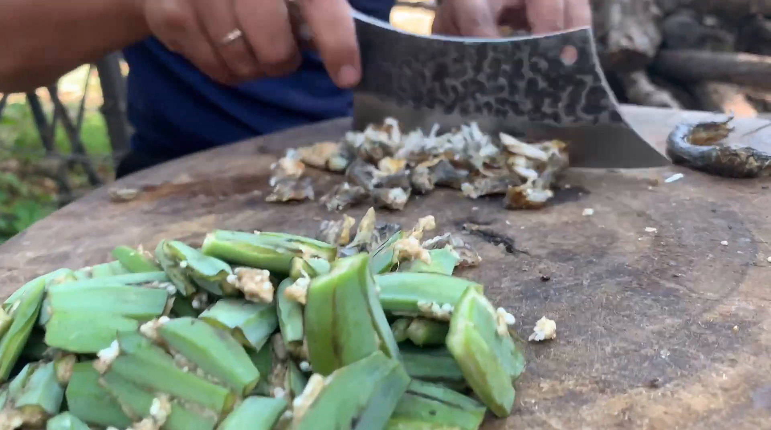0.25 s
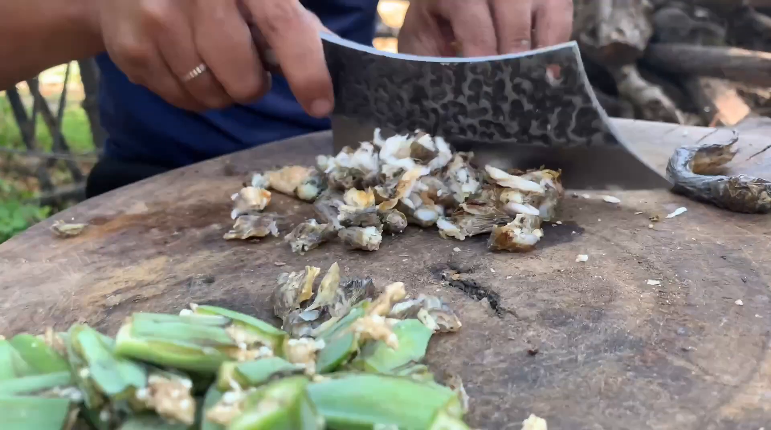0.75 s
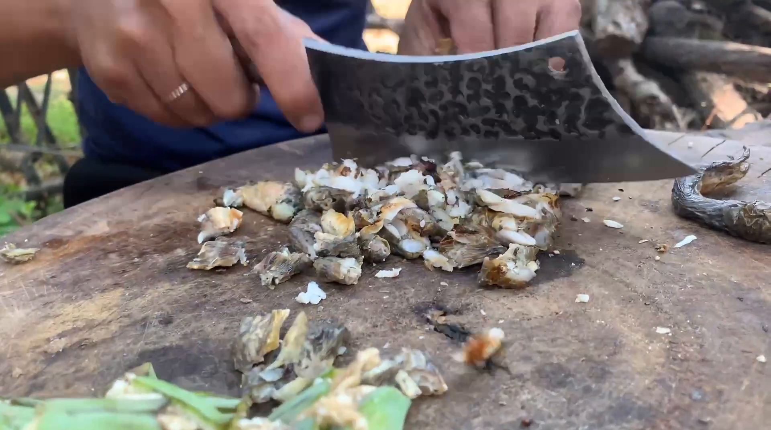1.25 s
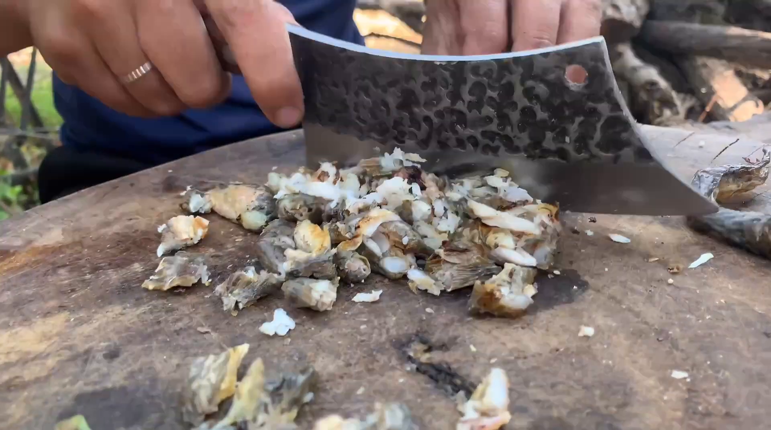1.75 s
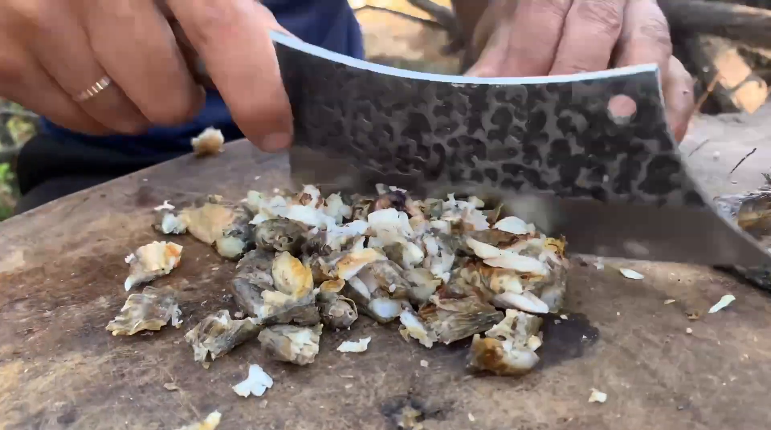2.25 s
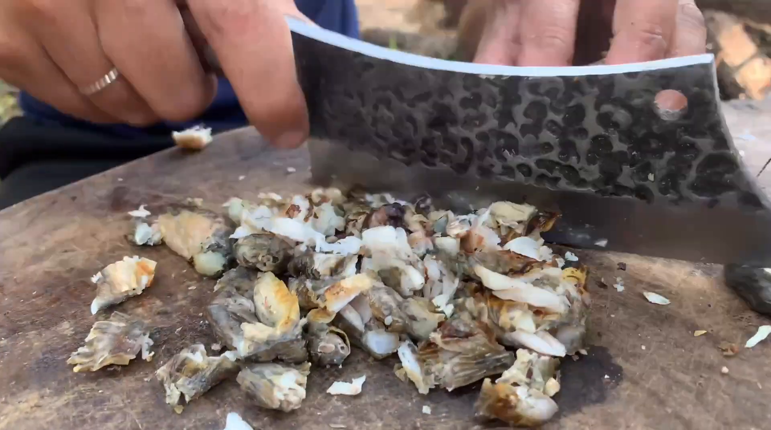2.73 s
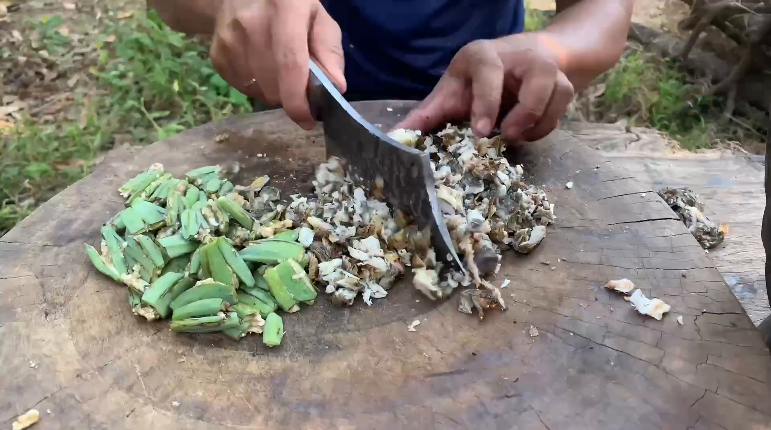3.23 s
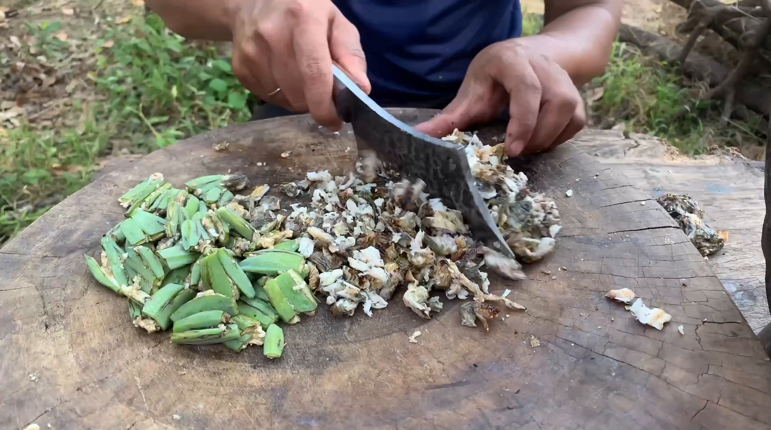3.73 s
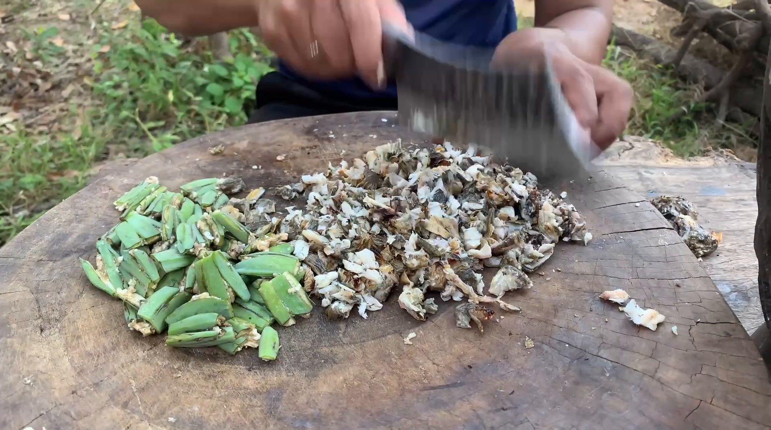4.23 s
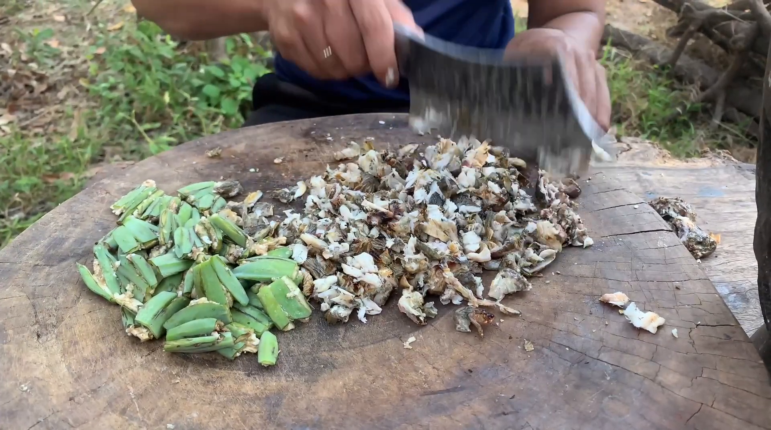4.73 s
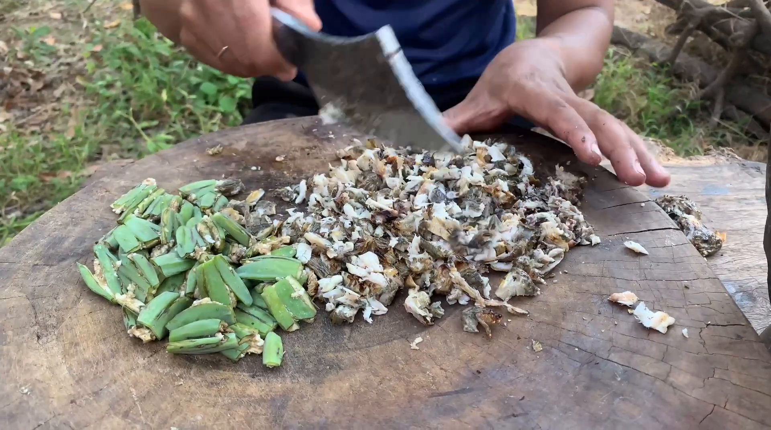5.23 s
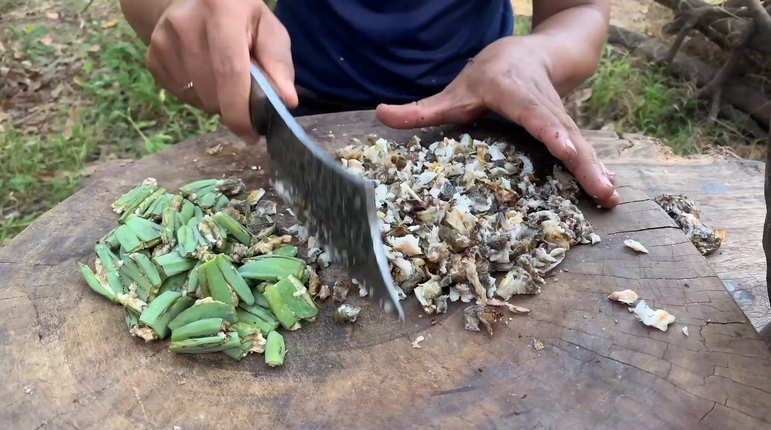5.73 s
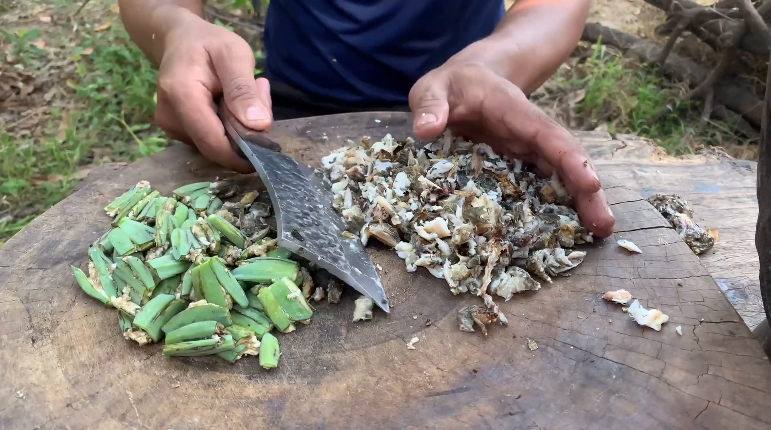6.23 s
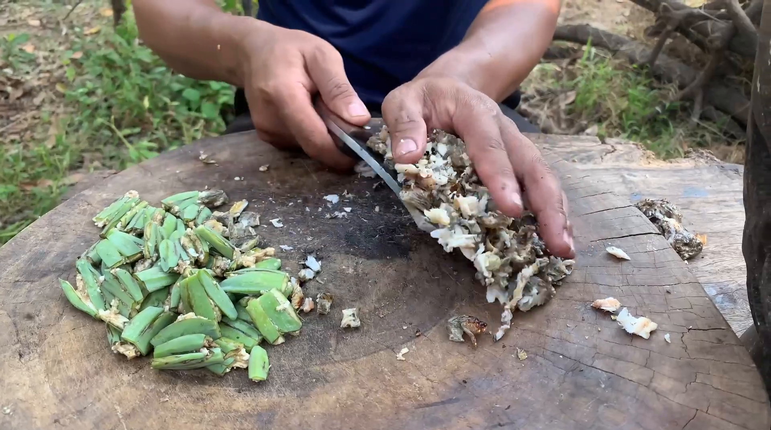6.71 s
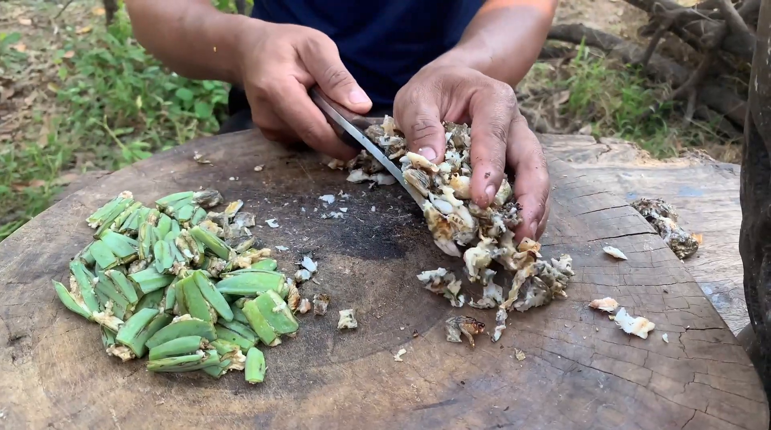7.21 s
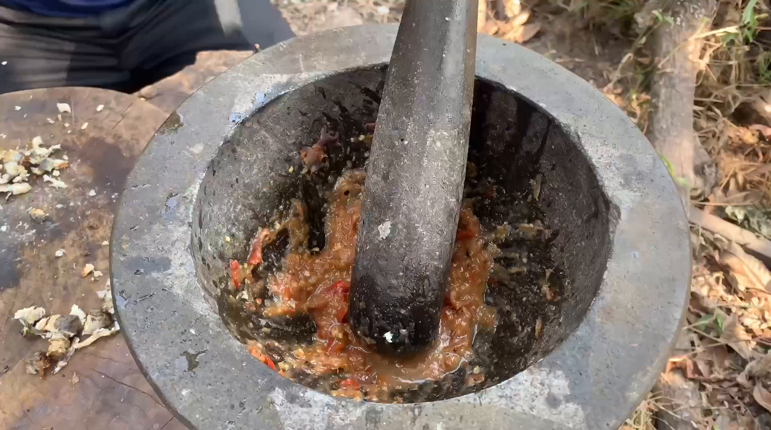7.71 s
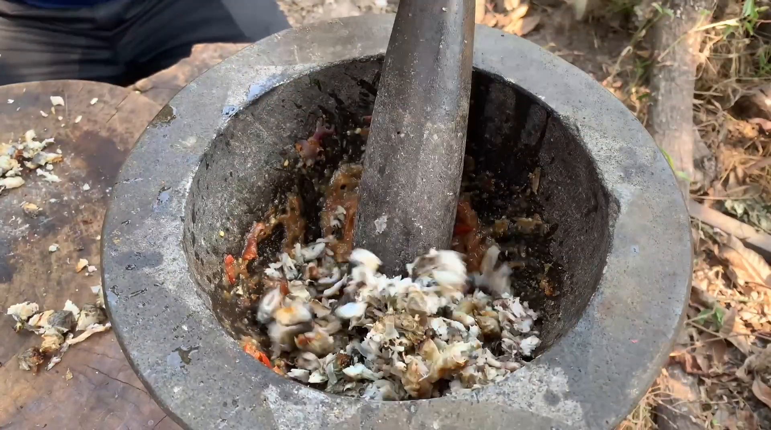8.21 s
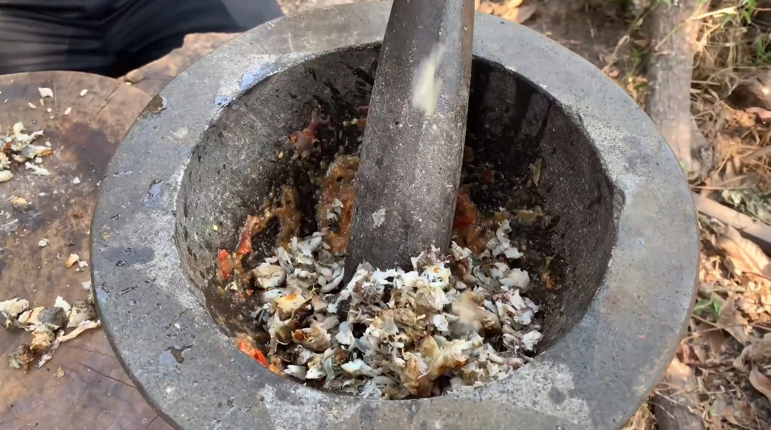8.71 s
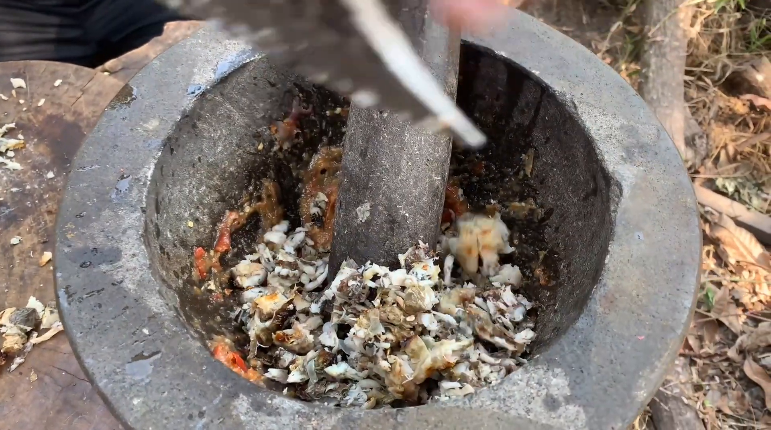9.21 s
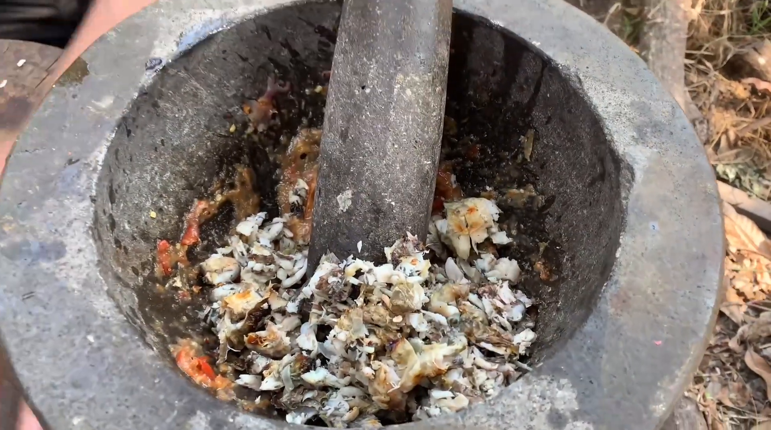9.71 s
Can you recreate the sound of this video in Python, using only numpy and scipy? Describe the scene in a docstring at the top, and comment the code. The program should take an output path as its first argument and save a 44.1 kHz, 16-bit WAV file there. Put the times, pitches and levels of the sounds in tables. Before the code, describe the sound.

Quick, even cleaver chops thud into wood and scatter crumbs, then the food is quietly scraped up and a pestle knocks on stone.

```python
"""Outdoors, at a thick tree-trunk block, a heavy steel cleaver chops brittle cooked food four times a second.
Each stroke cracks onto the wood and scatters crackling debris; the impact excites the damped
normal modes of blade and block, and the trunk thumps and rumbles. Then the heap is scraped together and
tipped into a stone mortar, both heard as friction noise, and the pestle knocks the bowl into vibration.
Far rumble and air hiss lie below."""
import sys
import numpy as np
from scipy import signal
from scipy.fft import rfft, irfft
from scipy.io import wavfile

SR = 44100
rng = np.random.default_rng(int(sys.argv[2]) if len(sys.argv) > 2 else 0)


def transcribe(signal):
    """Save signal, clipped to [-1, 1], as a 16-bit WAV file at the path in sys.argv[1]."""
    frames = np.atleast_2d(signal).T
    limited = np.clip(frames, -1, 1)
    pcm = np.round(limited * 32767).astype(np.int16)
    wavfile.write(sys.argv[1], SR, pcm)


N = 439233


def amp(db):
    """Amplitude ratio of a level: a factor of ten per 20 dB."""
    return 10 ** (np.asarray(db) / 20)


def in_time(rows):
    """Linear interpolation of each level column at every sample."""
    times_s, *columns = np.transpose(rows)
    return [np.interp(np.arange(N) / SR, times_s, column) for column in columns]


def drift(rate_hz):
    """Slow random modulation: interpolated Gaussian values with a spread near 1."""
    knots = rng.standard_normal(int(N / SR * 60) + 2)
    return np.interp(np.arange(N) * rate_hz / SR, np.arange(len(knots)), knots) * 1.2


def coloured(source, spectrum):
    """Spectral shaping by a curve of level against log frequency; rms 1."""
    hz = np.arange(1, N // 2 + 2) * SR / N
    knots_hz, density_db = np.transpose(spectrum)
    gain = amp(np.interp(np.log(hz), np.log(knots_hz), density_db, -90, -90))
    out = irfft(rfft(source) * gain, N)
    return out / np.sqrt(np.mean(out ** 2))


def noise(coherence):
    """Partially coherent white noise in two channels."""
    mid, side = rng.standard_normal((2, N))
    return np.sqrt(1 + coherence) * mid + np.sqrt(1 - coherence) * side * [[1], [-1]]


def grains(per_s, spread_db, coherence):
    """Shot noise: random snaps of uneven size over a floor of white noise."""
    sizes = amp(spread_db * np.minimum(rng.exponential(1, N), 4))
    occurs = rng.random(N) < per_s / SR
    return (sizes * occurs + 0.37) * noise(coherence)


def add(track, sound, start_s):
    """Superposition of a short stereo sound on a track."""
    at = int(start_s * SR)
    track[:, at:at + sound.shape[1]] += sound[:, :N - at]


def swell(peak_s, level_db, rise_s, fall_s):
    """Exponential growth up to a moment and exponential decay after it."""
    t = np.arange(N) / SR - peak_s
    return amp(level_db) * np.exp(np.where(t < 0, t / rise_s, -t / fall_s).clip(-40))


def held(rows, attack_s=0.014, release_s=0.023):
    """Linear attack, hold and exponential release: one envelope per level column."""
    t, out = np.arange(N) / SR, 0
    for start_s, held_s, *levels_db in rows:
        attack = np.clip((t - start_s) / attack_s, 0, 1)
        release = np.exp(-np.clip(t - start_s - held_s, 0, 1) / release_s)
        out = out + np.outer(amp(levels_db), attack * release)
    return out


def struck(modes, contact_s, rattle, rattle_s, t60_scale=1.0, detune=0.033, size=int(0.4 * SR)):
    """Modal response to a blow and its dying rattle, low-passed by the contact time; mono peak 1."""
    t = np.arange(size) / SR
    rattle_shape = t / rattle_s * np.exp(1 - t / rattle_s)
    jolts = (t == 0) + rattle / np.sqrt(rattle_s * SR) * rng.standard_normal(size) * rattle_shape
    force = signal.lfilter(np.hanning(int(contact_s * SR) + 3), [1], jolts)
    out = np.zeros((2, size))
    for hz, level_db, t60_s, pan_db, lead_rad in modes:
        pitch_luck, level_luck, phase_luck = rng.standard_normal(3)   # no two blows are alike
        decay = amp(-60 / (t60_s * t60_scale * SR))
        pole = decay * np.exp(2j * np.pi * hz * (1 + detune * pitch_luck) / SR)
        ring = signal.lfilter([1, -1], [1, -pole], force) / abs(1 - pole)   # a steady push is silent
        phase_rad = lead_rad + phase_luck * (hz / 1400) ** 2   # higher modes differ more between sides
        left = amp(pan_db / 2) * np.exp(0.5j * phase_rad)
        out += np.imag(amp(level_db + 2 * level_luck) * ring * [[left], [1 / left]])
    return out / np.max(np.abs(out.mean(0)))


def favour(modes, favoured_hz, db_per_octave):
    """The point of impact weights the modes: levels fall away on both sides of one pitch."""
    return [(hz, level_db - db_per_octave * abs(np.log2(hz / favoured_hz)), *rest)
            for hz, level_db, *rest in modes]


def band_filtered(peaks, source, wander_db=4):
    """Parallel two-pole band-pass filters whose levels wander independently; rms 1."""
    out = 0
    for hz, width_hz, level_db in peaks:
        radius = np.exp(-np.pi * width_hz / SR)
        poles = [1, -2 * radius * np.cos(2 * np.pi * hz / SR), radius ** 2]
        response = (1 - radius ** 2) * signal.lfilter([1, 0, -1], poles, source)
        out = out + amp(level_db + wander_db * drift(35)) * response
    return out / np.sqrt(np.mean(out ** 2))


# Background level curves: time_s, rumble_db, murmur_db, hiss_db
AIR_LEVELS = [(0.0, -48.5, -53.5, -69), (0.64, -59.5, -62.5, -75.5), (3.15, -55.5, -67, -72.5),
              (3.35, -49, -60.5, -63.5), (5.0, -56, -63, -65), (5.3, -54, -60, -65),
              (6.7, -52.5, -60.5, -60.5), (7.65, -54.5, -61.5, -63.5), (7.75, -49, -66, -64),
              (9.96, -53.5, -63, -65)]
# Spectra of the three background noises: frequency_hz, density_db
RUMBLE_SPECTRUM = [(12, -44.5), (20, -15), (41, -10), (65, -4), (124, -13.5), (178, -27), (200, -26),
                   (260, -64.5), (440, -120)]
MURMUR_SPECTRUM = [(88, -48.5), (150, -3.5), (539, -7), (634, -9), (814, -11), (1090, -13), (1350, -14.5),
                   (2000, -20), (2600, -40.5), (4400, -120)]
HISS_SPECTRUM = [(880, -37), (1500, -3), (1910, 6), (2820, 5), (4310, 4), (6600, -3), (7150, -9),
                 (8390, -2), (11000, -15.5), (12500, -52), (16200, -90), (22000, -120)]
def air():
    """Amplitude-modulated ambient noise: lumpy far rumble, a soft murmur of air and hiss."""
    rumble_db, murmur_db, hiss_db = in_time(AIR_LEVELS)
    rumble = amp(rumble_db + 2.0 * drift(2.3)) * coloured(noise(0.98), RUMBLE_SPECTRUM)
    murmur = amp(murmur_db + 0.94 * drift(37)) * coloured(noise(0.056), MURMUR_SPECTRUM)
    hiss = amp(hiss_db - 3.5 + 0.84 * drift(8.6)) * coloured(noise(0.0083), HISS_SPECTRUM)
    return rumble + murmur + hiss


# Brief spells of a faint band of noise: start_s, held_s, level_db
BAND_SPELLS = [(4.845, 0.093, -60), (9.54, 0.096, -63), (9.65, 0.32, -58)]
# Its spectral peaks: centre_hz, width_hz, level_db
BAND_PEAKS = [(1700, 200, 0), (2020, 110, 6), (2600, 250, -6), (3880, 200, -3)]
def faint_band():
    """Band-pass filtering: a brief faint band of noise near 2 kHz."""
    envelope, = held(BAND_SPELLS)
    return envelope * band_filtered(BAND_PEAKS, noise(0.18))


def rustle(patch_db=3.5):
    """Shot noise of moist food shifting under hand and blade, in patches, following the hiss level."""
    hiss_db = in_time(AIR_LEVELS)[2]
    shifting = coloured(grains(500, 4.0, 0.3), HISS_SPECTRUM)
    shared_drift, out = drift(7), 0
    for band_hz in [(1200, 2600), (2600, 5000), (5000, 8000), (8000, 12000)]:
        band = signal.sosfilt(signal.butter(2, band_hz, "band", fs=SR, output="sos"), shifting)
        out = out + amp(patch_db * (shared_drift + 0.8 * drift(26))) * band
    return amp(hiss_db - 1 - patch_db) * out


# Crumbs that snap or land: time_s, peak_db, pitch_hz, pan_db
CRUMB_SNAPS = [(0.43, -43, 2600, -2), (0.681, -39.5, 2400, 6), (0.68, -67, 6940, -6),
               (0.8775, -57, 4820, -0.5), (1.3053, -48, 4500, -5), (1.672, -59, 4840, 3),
               (2.124, -64, 4000, 1.5), (2.146, -50, 5800, 0.5), (2.196, -56.5, 4200, 0),
               (2.537, -51, 7000, 0), (2.557, -57, 9200, -2), (2.629, -52, 5940, 3), (2.68, -55, 7470, -3),
               (4.007, -37, 4960, 2), (4.799, -42, 3500, 4), (3.186, -51.5, 2580, -0.5),
               (3.473, -33, 3980, -1.5), (3.774, -46, 6550, 0), (3.814, -47.5, 3980, -2.5),
               (6.7864, -48.5, 4280, -2), (6.9502, -50, 3080, -1), (7.6945, -46, 1800, -7.5),
               (7.899, -46, 4240, 0), (7.926, -49, 9520, 10.5), (8.0353, -55, 5940, -3),
               (8.095, -33, 6540, 2), (8.748, -51, 9350, 2.5)]
def crumbs(strays_per_s=6, chopping_s=5.3):
    """Heavily damped vibration: each crumb rattles and rings a few cycles around its pitch."""
    out = np.zeros((2, N))
    luck = rng.random((int(strays_per_s * chopping_s), 4))   # faint strays fall during the chopping
    strays = [(chopping_s * when, -66 + 8 * loud, 3000 * 3 ** high, 12 * side - 6)
              for when, loud, high, side in luck]
    for time_s, peak_db, hz, pan_db in CRUMB_SNAPS + strays:
        modes = [(min(ratio * hz, 11000), -3, 12 / hz, pan_db, 0) for ratio in (0.5, 0.75, 1, 1.4, 1.9)]
        snap = struck(modes, 0.00005, 10.89, 0.0016, size=1800)
        add(out, amp(peak_db) * snap, max(time_s - 0.003, 0))
    return out


# High, middle and low modes of the block: pitch_hz, level_db, base_t60_s, pan_db, left_lead_rad
KNOCK_MODES = [(943.7, -6, 0.13, 4.5, 0.8), (898, -8, 0.11, 8, 2), (1140, -8, 0.013, 9, 2),
               (1290, 2, 0.11, 8.5, -1.34), (1467, -13.5, 0.0044, 11, 10), (1612, -17, 0.036, 1.5, -1.94),
               (1797, -2.5, 0.072, 19, 1.5), (2570, -16.5, .03, 7.5, 7)]
BODY_MODES = [(330, -7, 0.063, -1.5, 0.24), (436.2, -1, 0.092, -0.5, 0.27), (451, 1.5, 0.047, -3.5, 0.16),
              (534.1, 0, 0.11, -1, 0.28), (606, -2, 0.11, 4.5, 0.16), (670, -2, .09, 1, .3),
              (800, -8, 0.11, 6.5, 0.41)]
THUMP_MODES = [(54.7, -9, 0.07, 0.003, .2), (102.6, -0.5, 0.063, 0.0043, 0.15),
               (129.34, -4.5, 0.19, 0.0047, 0.15), (165.2, 3.5, 0.068, 0.0017, 0.13),
               (245.3, -3.5, 0.045, 0.0062, 0.18)]
KNOCK_T60_SCALE = 0.22   # the blade on the wood damps the high modes
# Rebounds and taps on the wood: start_s, body_db, favoured_body_hz, knock_db, thump_db
BLOCK_TAPS = [(2.512, -21, 530, -45, -21.5), (2.773, -19.5, 500, -52, -22.5), (3.034, -27, 500, -53, -30.5),
              (3.396, -49, 500, -56, -27), (3.8, -39.5, 500, -49.5, -44.5), (4.567, -25.5, 500, -51, -32.5),
              (4.817, -21, 500, -43, -47), (5.107, -69.5, 500, -70, -34), (5.7801, -11, 500, -25, -38),
              (6.157, -36.5, 450, -60.5, -43.5), (6.231, -61.5, 450, -69.5, -45),
              (6.645, -44.5, 750, -49.5, -49), (7.356, -52.5, 500, -54.5, -52.5),
              (8.088, -48, 500, -53, -62), (8.16, -47.5, 500, -58, -63), (8.492, -52.5, 500, -64, -59.5),
              (8.654, -51.5, 500, -52, -59), (9.389, -55, 808, -56, -63.5)]
def block_taps():
    """Light impacts excite the normal modes of the block."""
    out = np.zeros((2, N))
    for start_s, body_db, body_hz, knock_db, thump_db in BLOCK_TAPS:
        knock = struck(KNOCK_MODES, 0.00038, 0.49, 0.0061, KNOCK_T60_SCALE)
        body = struck(favour(BODY_MODES, body_hz, 23), 0.0014, 0.81, 0.0045, t60_scale=0.7)
        thump = struck(THUMP_MODES, 0.0089, 0.46, 0.022, t60_scale=0.98)
        add(out, amp(knock_db) * knock + amp(body_db) * body + amp(thump_db) * thump, start_s)
    return out


# Drags of blade and food, and the heap tipped out: start_s, held_s, grit_db, blade_db, wood_db
DRAGS = [(1.24, 0.061, -65.5, -59, -68.5), (5.81, 0.035, -55.5, -69, -55), (6.15, 0.031, -63, -55.5, -49),
         (6.27, 0.16, -64, -64, -81.5), (6.348, 0.041, -67, -55, -46.5), (6.46, 0.042, -63, -57, -48.5),
         (6.495, 0.013, -59, -51.5, -49), (6.545, 0.034, -61, -49, -50), (7.342, 0.02, -60.5, -63, -64),
         (7.9, 0.03, -62.5, -81, -63.5), (8.03, 0.11, -55, -78.5, -59), (8.73, 0.013, -56.5, -74, -76.5),
         (9.875, .09, -59.5, -67, -46.5)]
# Spectrum of the direct friction sound: frequency_hz, density_db
GRIT_SPECTRUM = [(530, -29), (900, -5), (1630, -5.5), (1970, -19), (2680, -3), (4960, -12), (10500, -7),
                 (12500, -51), (16200, -57), (22000, -120)]
# Resonances of rubbed steel: pitch_hz, width_hz, level_db
BLADE_RESONANCES = [(1710, 90, 4), (2070, 100, -3), (2650, 150, 3), (3500, 150, -3), (3950, 200, 1),
                    (1220, 200, 0)]
def scraping():
    """Stick-slip friction radiates directly and drives the blade and the block's middle modes."""
    grit_gain, blade_gain, wood_gain = held(DRAGS)
    wood_resonances = [(hz, 0.51 / t60_s, level_db) for hz, level_db, t60_s, *_ in BODY_MODES]
    catching = amp(2.5 * drift(70))   # the edge catches and slips
    friction = grains(500, 4.5, 0.2)
    grit = coloured(grains(900, 4.0, 0.15), GRIT_SPECTRUM)
    blade = band_filtered(BLADE_RESONANCES, friction)   # resonances come and go as the edge tilts
    wood = band_filtered(wood_resonances, grains(970, 2.2, 0.56), wander_db=4.5)
    return catching * (grit_gain * grit + blade_gain * blade + wood_gain * wood)


# Knocks of the pestle: time_s, level_db
PESTLE_KNOCKS = [(9.857, -14), (9.948, -40)]
# Modes of the stone mortar: pitch_hz, level_db, base_t60_s, pan_db, left_lead_rad
MORTAR_MODES = [(377, 8, 0.11, -2.5, 7), (500, -11.5, 0.055, 15.5, 5.5), (700, 8.5, 0.022, 1.5, 14),
                (1664, 7, 0.063, -7.5, 0), (1970, -6.5, 0.022, 21.5, 6.5), (2560, -3, 0.058, -3, 16.5),
                (3900, -17, 0.019, -6, -13), (4500, -14.5, 0.06, -11.5, 7)]
def pestle():
    """Hard impact on stone: a brief contact excites the high modes, and the bowl's low modes follow."""
    out = np.zeros((2, N))
    for time_s, level_db in PESTLE_KNOCKS:
        click = struck(MORTAR_MODES[3:], 0.00014, 0.3, 0.002, t60_scale=0.42, detune=0.01)
        bowl = struck(MORTAR_MODES[:3], 0.00036, 1.14, 0.0044, t60_scale=0.76, detune=0.0086)
        add(out, amp(level_db - 4.5) * click, time_s - 0.001)
        add(out, amp(level_db) * bowl, time_s + 0.00272)
    return out


def lingering_mode(start_s=3.745, peak_db=-33.5, pitch_hz=140, t60_s=0.9):
    """Free decay: one stroke leaves a lightly damped low mode ringing."""
    out = np.zeros((2, N))
    tone = struck([(pitch_hz, 0, t60_s, 0, 0)], 0.002, 0.34, 0.0062, detune=0)
    add(out, amp(peak_db) * tone, start_s)
    return out


# Cleaver strokes: time_s, favoured_steel_hz, bite_db, crack_db, knock_db, favoured_knock_hz, body_db,
# favoured_body_hz, thump_db, rumble_db, lead_in_db, debris_db, debris_decay_s
STROKES = [(0.2008, 4000, -22, -21, -5, 1280, -10.5, 477, -16, -44.5, -34, -41, 0.013),
           (0.4535, 3530, -20, -31.5, -4.5, 1310, -10.5, 432, -15.5, -56, -35, -41, 0.011),
           (0.7154, 6500, -33, -21.5, -5.5, 1283, -14, 474, -18, -42, -31.5, -47, 0.023),
           (0.972, 7840, -27.5, -21.5, -6.5, 1263, -9.5, 315, -18.5, -59, -44, -46.5, 0.014),
           (1.227, 7250, -34.5, -15.5, -15, 1371, -22.5, 550, -20.5, -40.5, -35, -37.5, 0.022),
           (1.4743, 3960, -22.5, -20, -7, 1255, -6, 376, -15, -36.5, -32, -47, 0.018),
           (1.731, 4350, -27.5, -20, -5, 860, -5.5, 440, -17, -33.5, -40.5, -46, 0.025),
           (1.9849, 6500, -32, -21.5, -7, 860, -8, 415, -15.5, -40, -38, -57, 0.067),
           (2.2258, 3810, -23.5, -19, -11, 1200, -8, 400, -19, -57, -38.5, -47, 0.013),
           (2.4792, 4300, -37, -16, -15, 1240, -20, 437, -16.5, -38, -37, -41.5, 0.023),
           (2.7273, 5000, -29.5, -14.5, -6.5, 900, -7, 461, -14.5, -36.5, -36, -47.5, 0.024),
           (2.9864, 6400, -20.5, -20.5, -7.5, 920, -6, 368, -19, -40, -35.5, -43.5, 0.012),
           (3.233, 3040, -42.5, -18, -7.5, 998, -2.5, 520, -20.5, -37.5, -30.5, -40, 0.016),
           (3.4882, 3320, -36, -24.5, -31, 1400, -23, 430, -24.5, -41.5, -39.5, -47, 0.021),
           (3.7338, 3880, -45, -23, -23.5, 1310, -23, 487, -23, -35, -37.5, -52, 0.05),
           (3.9926, 5840, -39, -26.5, -25, 1200, -21.5, 417, -19, -29.5, -36, -47.5, 0.019),
           (4.2791, 3800, -36.5, -18, -6.5, 1280, -5, 533, -37, -26.5, -36.5, -41, 0.017),
           (4.527, 5460, -55.5, -24, -27.5, 960, -22, 626, -28, -28, -34.5, -41.5, .015),
           (4.781, 3900, -26.5, -29, -9.5, 1290, -1.5, 620, -26.5, -22.5, -43, -48.5, 0.02),
           (5.028, 4040, -47, -27, -37, 1260, -28, 440, -25, -38.5, -42, -38, 0.011)]
# Modes of the struck cleaver: pitch_hz, level_db
STEEL_MODES = [(3050, -4.5), (3820, 2.5), (4400, -2), (5030, -9), (6400, 0), (7300, -1.5), (8040, -1),
               (10300, -2)]
def cleaver_impacts(steel_t60_s=0.018):
    """Impact excitation: a soft first bite, the steel's ring, then the block from its high modes down."""
    out = np.zeros((2, N))
    steel_modes = [(hz, level_db, steel_t60_s, 0, 0) for hz, level_db in STEEL_MODES]
    for stroke in STROKES:
        time_s, steel_hz, bite_db, crack_db, knock_db, knock_hz, body_db, body_hz, thump_db = stroke[:9]
        knock_modes = favour(KNOCK_MODES * 2, knock_hz, 8.5)   # each mode twice, detuned at random
        body_modes = favour(BODY_MODES * 2, body_hz, 15.5)
        steel = struck(favour(steel_modes, steel_hz, 13), 0.00005, 2.2, 0.00017, size=3000)
        bite = struck(KNOCK_MODES[:4] + BODY_MODES, 0.0009, 1.1, 0.0089, KNOCK_T60_SCALE)
        knock = struck(knock_modes, 0.00049, 0.66, 0.0011, KNOCK_T60_SCALE, detune=0.051)
        body = struck(body_modes, 0.0012, 1.1, 0.0039, t60_scale=0.5, detune=0.07)
        thump = struck(THUMP_MODES, 0.0041, 0.43, 0.0065, t60_scale=0.5 + 0.1 * time_s)
        add(out, amp(bite_db) * bite, time_s - 0.0095)
        add(out, amp(crack_db - 4) * steel, time_s)
        add(out, amp(knock_db) * knock, time_s + 0.001693)
        add(out, amp(body_db) * body, time_s + 0.0034)
        add(out, amp(thump_db) * thump, time_s + 0.0066)
    return out


# Spectra of debris and lead-in, edge on wood, weak block modes, trunk rumble: frequency_hz, density_db
GRAIN_SPECTRUM = [(710, -27.5), (1200, -7), (1590, -16), (2360, -12.5), (6740, -14.5), (10500, -22.5),
                  (12500, -51), (16200, -78.5), (22000, -120)]
CRACK_SPECTRUM = [(880, -27.5), (1500, -10), (2690, -11.5), (3270, -10), (4350, -9), (5780, -20),
                  (7340, -14), (8840, -21.5), (10400, -11), (11500, -22), (12500, -46.5), (16200, -66),
                  (22000, -120)]
TAIL_SPECTRUM = [(200, -31.5), (350, -1), (700, 0.5), (1300, -3), (2000, -13), (3200, -23.5), (5000, -59)]
TRUNK_SPECTRUM = [(35, -32.5), (60, -0.5), (174, 3.5), (294, -6), (518, -9.5), (669, -14.5), (755, -34.5),
                  (887, -22), (1500, -49.5), (1950, -73.5), (3300, -120)]
def cleaver_noise(lead_in_s=0.018):
    """Impact transients: crack, debris and rumble; modal overlap blurs weak modes into a dull tail."""
    t = np.arange(N) / SR
    lead_in = crack = debris = tail = settling = rumble = 0   # envelopes
    for time_s, _, _, crack_db, knock_db, _, body_db, *rest in STROKES:
        rumble_db, lead_in_db, debris_db, debris_s = rest[2:]
        fade_in = np.clip((t - time_s + lead_in_s) / 0.011, 0, 1)
        tail_db = max(knock_db, body_db) - 21.5
        # short grainy noise swells just before each crack
        lead_in += fade_in * swell(time_s, lead_in_db, 0.011, 0.00045)
        crack += swell(time_s + 0.00043, crack_db, 0.0017, 0.0015)
        debris += swell(time_s + 0.0012, debris_db, 0.00063, debris_s)
        tail += swell(time_s + 0.0035, tail_db, 0.0057, 0.014)
        settling += swell(time_s + 0.012, tail_db - 23.5, 0.006, 0.044)   # the heap hops and settles
        rumble += swell(time_s + 0.021, rumble_db + 1, 0.0046, 0.043)
    grainy = lead_in * coloured(grains(3000, 3.0, 0.2), GRAIN_SPECTRUM)
    crackle = amp(3 * drift(40)) * coloured(grains(700, 4.5, 0.2), GRAIN_SPECTRUM)
    rattles = amp(4 * drift(55)) * coloured(grains(500, 3.5, 0.3), TAIL_SPECTRUM)
    food = debris * crackle + settling * rattles
    wood = tail * coloured(noise(0.24), TAIL_SPECTRUM)
    edge = crack * coloured(noise(0.028), CRACK_SPECTRUM)
    trunk = rumble * coloured(noise(1.0), TRUNK_SPECTRUM)
    return grainy + food + wood + edge + trunk


def scene():
    """Linear superposition of all sources."""
    chopping = cleaver_impacts() + cleaver_noise() + block_taps() + lingering_mode() + crumbs()
    return chopping + pestle() + scraping() + faint_band() + rustle() + air()


def record(dry):
    """Band limiting and soft saturation: the deepest bass and the top are cut, loud peaks are rounded."""
    dry = signal.sosfilt(signal.butter(2, 22, "high", fs=SR, output="sos"), dry)
    rounded = dry / (1 + (dry / 0.96) ** 4) ** 0.25
    return signal.sosfilt(signal.cheby2(12, 70, 13200, fs=SR, output="sos"), rounded)


dry = scene()
out = record(dry)
transcribe(out)
```